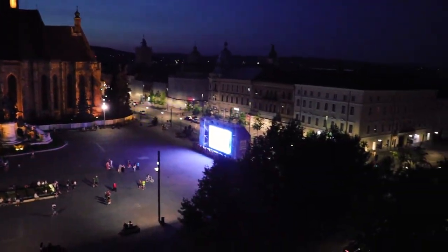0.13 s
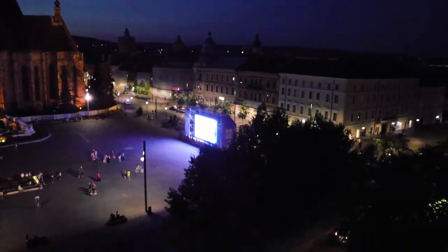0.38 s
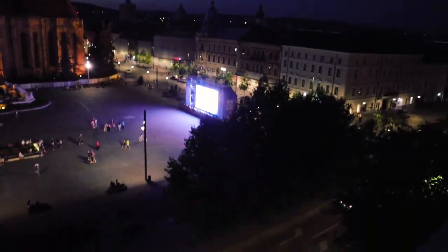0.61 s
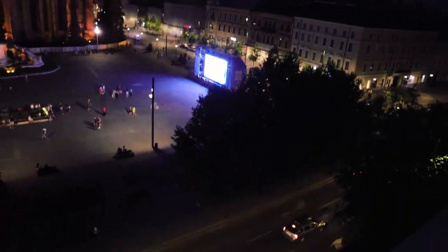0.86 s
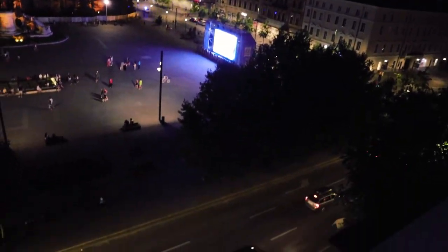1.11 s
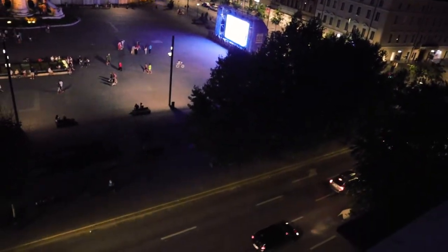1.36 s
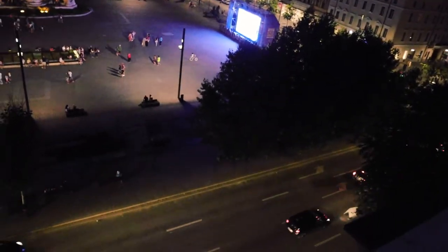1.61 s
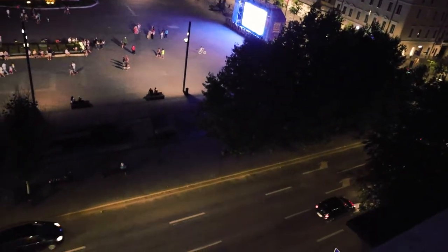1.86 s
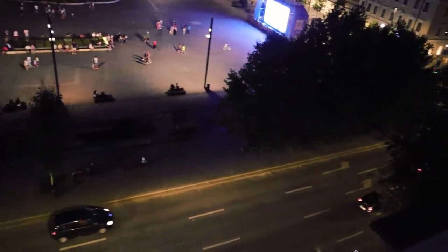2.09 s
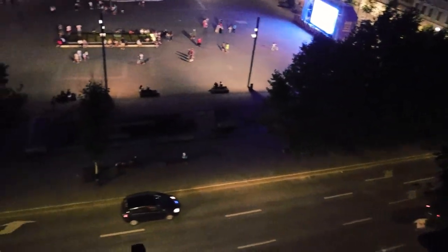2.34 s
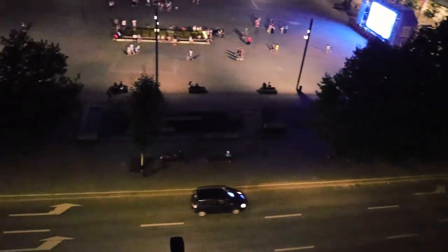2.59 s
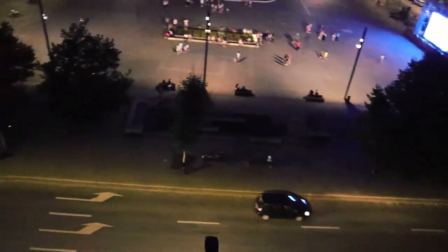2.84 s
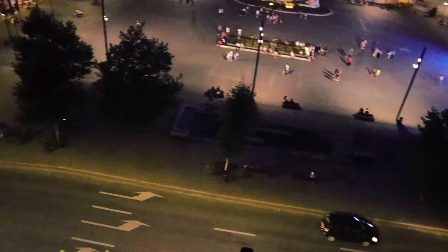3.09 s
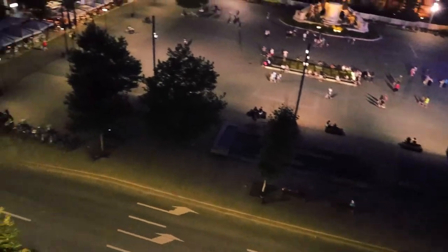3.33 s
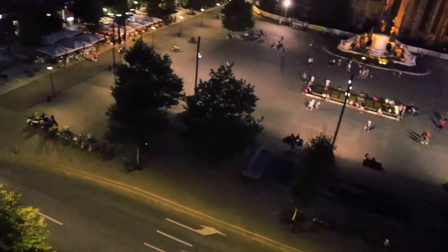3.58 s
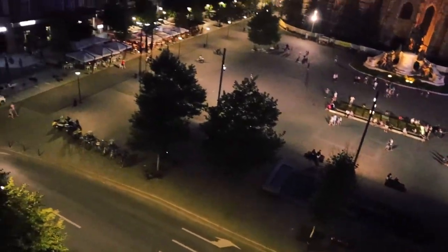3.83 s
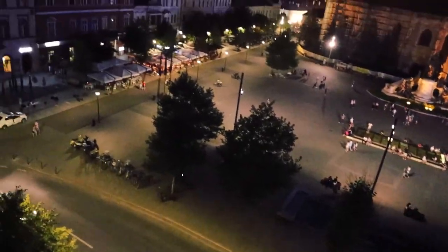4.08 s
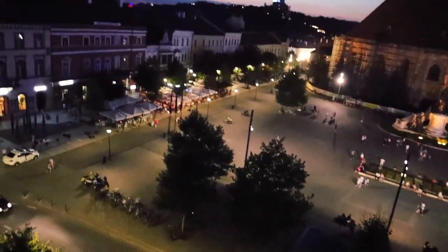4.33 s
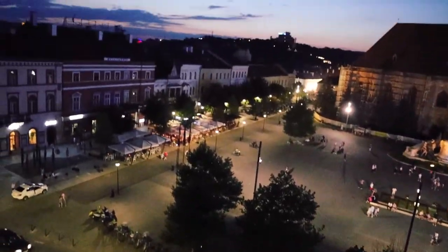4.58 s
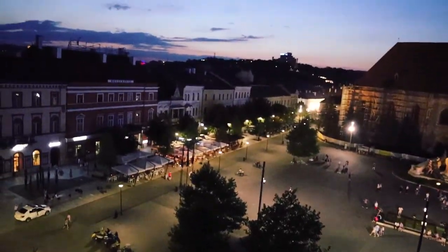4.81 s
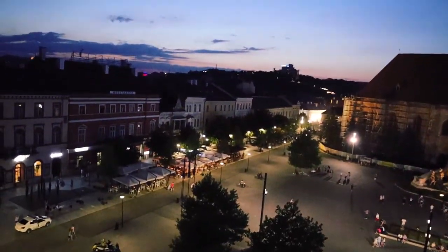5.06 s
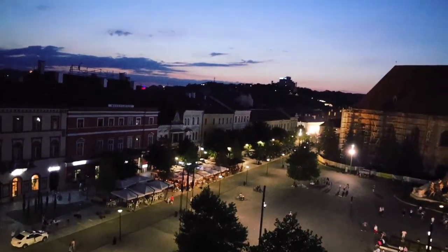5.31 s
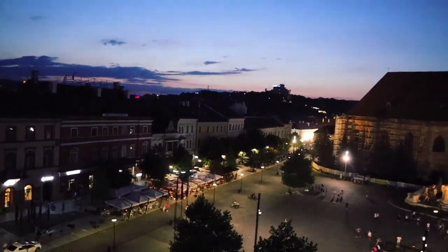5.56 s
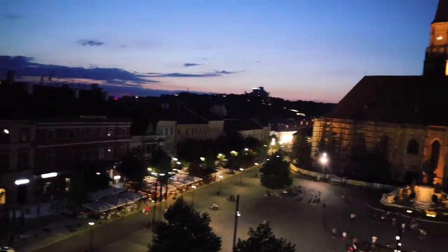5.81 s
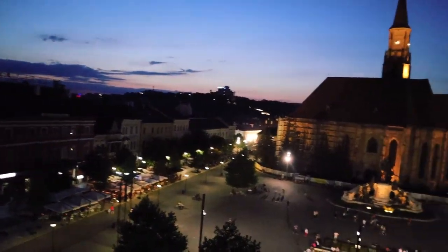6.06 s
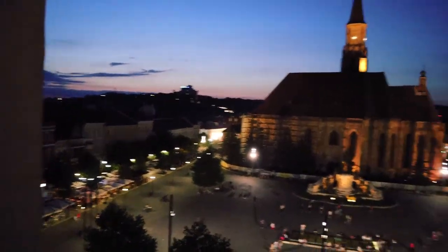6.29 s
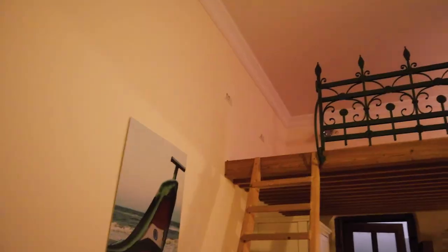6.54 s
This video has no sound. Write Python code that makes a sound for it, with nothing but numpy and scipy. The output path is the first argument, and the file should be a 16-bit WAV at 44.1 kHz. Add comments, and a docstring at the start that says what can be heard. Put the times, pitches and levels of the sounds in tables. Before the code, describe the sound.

From a high window, a hand-held camera hears continuous evening traffic: deep rumble, broad tyre roar and soft hiss. Low engines hum, and a dull bump thumps before two and a half seconds. A heavy engine swells near four seconds, with tiny brake squeaks before it. Two faint swift calls come late. A handling tick, then an abrupt cut to a muffled room with more ticks.

```python
"""Evening traffic from a high window

A hand-held camera pans over the street: coloured noise makes deep rumble, tyre roar, hiss and top treble.
Oscillators make a heavy engine, further hums, whines, brake squeaks and two swift calls; wheels thump on a bump.
A cut with a short near-mute leads indoors, to a muffled street and a faint hum.
Before and after the cut the camera's housing ticks in the hand, as short ringing modes with a crack of noise."""
import sys
import numpy as np
from scipy import signal
from scipy.fft import rfft, irfft, next_fast_len
from scipy.io import wavfile
from scipy.ndimage import uniform_filter1d, map_coordinates

SR = 44100
rng = np.random.default_rng(int(sys.argv[2]) if len(sys.argv) > 2 else 0)


def volts_from_decibels(level):
    """Turn decibel levels (scalar or array-like) into linear amplitude factors."""
    exponent = np.asarray(level, float) / 20
    return 10 ** exponent


def materialize(psi):
    """Save the field psi as 16-bit PCM at rate SR to the path in sys.argv[1].

    A 1-D psi becomes a single channel; in a 2-D psi each row is a channel.
    """
    bounded = np.clip(np.atleast_2d(psi).T, -1, 1)
    quanta = np.round(bounded * 32767).astype(np.int16)
    wavfile.write(sys.argv[1], SR, quanta)


N = 294147

# the road below as the camera pans: [t/s, tyre roar level/dB, toward the left -1..1]
ROAD_PAN = [(0, -24, .2), (2.2, -22.5, 0.22), (3.35, -22, .1), (4.2, -23, -.02), (5.4, -23.5, -.09),
            (6.44, -25.5, -0.15)]
# level of the top treble: [t/s, level/dB]
SIZZLE_LEVEL = [(0, -49), (.6, -52.5), (1.2, -50), (2.2, -53), (2.75, -59.5), (3.35, -52.5), (4.2, -54.5),
                (4.8, -57), (5.4, -53), (6.15, -58.5)]
# noise colours in the mid channel, each relative: [f/Hz, level/dB per Hz]
DEEP_COLOUR = [(15, -24), (25, -5), (32, -12), (40, 2), (55, 6.5), (75, 0.5), (95, -7.5), (130, -54.5)]
RUMBLE_COLOUR = [(45, -39), (70, -1.5), (100, 0), (135, 1), (165, -2.5), (260, -9.5), (340, -32),
                 (570, -120)]
ROAR_COLOUR = [(110, -26), (180, -1.5), (337, -2.5), (439, -1.5), (513, -3.5), (600, -2.5), (971, -4.5),
               (1380, -7), (3200, -28.5), (4160, -37.5), (7040, -120)]
HISS_COLOUR = [(1060, -27), (1800, -1.5), (3690, -14.5), (4570, -17), (7500, -31.5), (9750, -66),
               (16500, -120)]
SIZZLE_COLOUR = [(3000, -13), (4600, 5.5), (5500, 1), (6500, 1.5), (8000, -1), (8700, -7), (9550, 2),
                 (10300, -1.5), (11800, -4.5), (12900, -13.5)]
ROOM_COLOUR = [(20, -40), (45, -3), (100, -5), (170, -9), (250, 1), (330, -8.5), (700, -6), (1100, -11.5),
               (1700, -17.5), (3000, -29.5), (5500, -40.5), (8000, -47), (12500, -49), (16000, -75)]
# widened microphone pair, before each source's own offset: [f/Hz, side over mid level/dB]
PAIR_WIDTH = [(60, -40), (110, -44), (200, -18.5), (360, -11.5), (640, -8), (1160, -1.5), (2100, 4.5),
              (3810, 5.5), (6890, 9), (12500, 7.5)]
# heavy engine: [t/s, firing f/Hz, firing line rms level/dB]
HEAVY_ENGINE = [(1.3, 62.5, -36), (2.1, 67.3, -30), (2.55, 69.5, -30.5), (2.8, 69.3, -31), (3, 68.6, -27),
                (3.46, 68.3, -25), (3.85, 67.6, -20), (4.15, 67.93, -24.5), (4.6, 71.3, -22.5),
                (4.85, 71.1, -25), (5.2, 63.3, -30)]
# further engines, wavering hums: [start t/s, end t/s, start f/Hz, end f/Hz, rms level/dB]
ENGINE_HUMS = [(0.5, 2.9, 36, 48, -32.5), (3, 4.35, 56, 50, -35), (5.5, 6.45, 50, 50, -33.5),
               (-0.5, 1.58, 57, 60, -35.5), (1.4, 2.43, 82, 81, -33.5), (5.1, 6, 137, 140, -34),
               (6, 6.4, 140, 138, -28), (3, 6.5, 90, 99, -34.5), (0.5, 1.4, 124, 126, -34.5)]
# wheels thump over a bump: [t/s, level before the soft onset/dB, starting f/Hz]
BUMP_THUMPS = [(2.437, -8, 105)]
# ticks of the housing: [t/s, level/dB, centre of the blow f/Hz, crack relative level/dB, left over right/dB]
HOUSING_TICKS = [(6.3252, -21.5, 3000, -10, 1), (6.52, -19.5, 3200, -10, -3), (6.5303, -23, 3000, -12, 6),
                 (6.56, -20.5, 1910, -40, -8), (6.5922, -27, 3600, -2, -4), (6.613, -29, 2800, -13, -3)]
# modes of the housing: [f/Hz, relative level/dB, t60/s]
HOUSING_MODES = [(1700, 3, 0.02), (2100, -1, .018), (2450, 0, 0.02), (3000, -4, .014), (3800, -5, 0.011),
                 (4500, -1, 0.017), (6460, -3, .01)]
# rough narrow whines: [start t/s, length/s, f/Hz, amplitude level/dB]
WHINE_LINES = [(.1, 1.6, 2160, -46.5), (.1, 1.3, 4550, -57), (.85, .32, 4600, -58),
               (5.78, 0.095, 1970, -35), (2.4, 3.2, 9700, -70)]
# squeaks of one brake: [start t/s, length/s, amplitude level/dB]
BRAKE_SQUEAKS = [(3, .08, -57), (3.2, .07, -64), (3.348, .046, -56), (3.5, .065, -52), (3.6, .04, -60)]
# swift calls: [t of the lowest pitch/s, lowest f/Hz, fall into it/Hz, rise out of it/Hz, rms level at the peak/dB]
SWIFT_CALLS = [(5.785, 6200, 199, 650, -52), (6.208, 6420, 446, 350, -51)]
# the cut: [street ends t/s, room starts t/s]
CUT_TIMES = (6.4432, 6.4548)

RUMBLE_DB = -5  # over the roar
HISS_DB, HISS_FADES_DB_PER_S = -38.5, 0.15  # start level at average roar
HISS_FOLLOWS = 0.66  # share of the roar's swell in dB
DEEP_DB, DEEP_FADES_DB_PER_S = -29, 0.6  # start level
SECOND_ORDER_DB, HUM_WAVER_HZ = -36, 1.56
THUMP_T60_S = .1
BLOW_OCTAVES = .5  # spread of a blow over the modes
WHINE_SPREAD = .025  # of the pitch
SQUEAK_HZ, SQUEAK_SPREAD_HZ = 7130, 50
SWIFT_LENGTH_S = 0.075
ROOM_DB, MUTE_DB = -33.5, -32  # the mute is relative to the room
ROOM_HUM_HZ, ROOM_HUM_DB = 249.6, -46


def unit(x):
    """Scale to rms 1."""
    return x / np.sqrt(np.mean(x ** 2) + 1e-20)


def along(points, hz):
    """Read (Hz, value) points on a log axis."""
    f, v = np.transpose(points)
    return np.interp(np.log(hz + 1), np.log(f + 1), v)


def curves(rows):
    """One value per sample for each column after the time."""
    s, *cols = np.transpose(rows)
    return [np.interp(np.arange(N) / SR, s, c) for c in cols]


def span(start, end, fade):
    """1 between two times, with soft edges."""
    t = np.arange(N) / SR
    return np.sin(np.pi / 2 * np.clip(np.minimum(t - start, end - t) / fade, 0, 1)) ** 2


def wobble(rate):
    """A smooth random curve, rate knots a second."""
    knots = rng.standard_normal(int(N * rate / SR) + 4)
    return map_coordinates(knots, [np.arange(N) * rate / SR])


def filtered(x, response):
    """Shape the spectrum of x by a response of frequency."""
    m = next_fast_len(N + 8192)
    return irfft(rfft(x, m) * response(np.fft.rfftfreq(m, 1 / SR)), m)[..., :N]


def widened(mid, side, extra_db=0):
    """Left and right from mid and side; the pair passes little side in the bass and much in the treble."""
    side = filtered(side, lambda hz: volts_from_decibels(along(PAIR_WIDTH, hz) + extra_db))
    return np.array([mid + side, mid - side])


def rush(spectrum, patchy_db, leftward, lag, extra_db=0):
    """Wide patchy noise, mid rms 1; side follows mid off to one side, in quadrature for an early left."""
    z = signal.stft(rng.standard_normal((2, N + 512)), nperseg=512)[2]
    field = uniform_filter1d(rng.standard_normal(z.shape[1:]), size=6, axis=0)
    field = uniform_filter1d(field, size=12, axis=1)
    pair = signal.istft(z * volts_from_decibels(patchy_db * unit(field)), nperseg=512)[1][:, :N]
    mid, other = unit(filtered(pair, lambda hz: volts_from_decibels(along(spectrum, hz))))
    early = filtered(mid, lambda hz: 1j * (hz > 0))
    own = np.sqrt(np.clip(1 - leftward ** 2 - lag ** 2, 0, 1))
    return widened(mid, leftward * mid + lag * early + own * other, extra_db)


def tone(hz):
    """Phase of an oscillator that follows a pitch per sample."""
    return 2 * np.pi * (np.cumsum(hz) / SR + rng.random())


def rough_line(start, length, hz, spread_hz, db):
    """A narrow line with fast scatter of pitch and level."""
    level = volts_from_decibels(db + 2.68 * wobble(120)) * span(start, start + length, fade=.25 * length)
    return level * np.sin(tone(hz + spread_hz * wobble(150)))


def traffic():
    """Many cars at once: rumble and hiss follow the tyre roar; every layer also swells on its own."""
    t = np.arange(N) / SR
    roar_db, leftward = curves(ROAD_PAN)
    treble_db, = curves(SIZZLE_LEVEL)
    deep_db = DEEP_DB - DEEP_FADES_DB_PER_S * t
    hiss_db = HISS_DB + HISS_FOLLOWS * (roar_db - roar_db.mean()) - HISS_FADES_DB_PER_S * t
    flutter = wobble(8.3)  # shared by roar, hiss and top treble

    deep = rush(DEEP_COLOUR, patchy_db=0.4, leftward=0, lag=0)
    deep = deep * volts_from_decibels(deep_db + 0.42 * wobble(2.95))
    rumble = rush(RUMBLE_COLOUR, patchy_db=1.34, leftward=leftward, lag=.1)
    rumble = rumble * volts_from_decibels(roar_db + RUMBLE_DB + 1.26 * wobble(3.92))
    roar = rush(ROAR_COLOUR, patchy_db=0.53, leftward=leftward, lag=0.17)
    roar = roar * volts_from_decibels(roar_db + 0.55 * flutter + 0.71 * wobble(2.905))
    hiss = rush(HISS_COLOUR, patchy_db=0.7, leftward=0.14 * leftward, lag=.1)
    hiss = hiss * volts_from_decibels(hiss_db + 0.2 * flutter + 0.63 * wobble(12))
    sizzle = rush(SIZZLE_COLOUR, patchy_db=2.0, leftward=0, lag=0)
    sizzle = sizzle * volts_from_decibels(treble_db + 0.26 * flutter + 1.1 * wobble(8.9))
    return deep + rumble + roar + hiss + sizzle


def heavy_engine():
    """Only low orders carry this far: a firing line of moving pitch and its second order."""
    hz, firing_db = curves(HEAVY_ENGINE)
    phase = tone(hz + .25 * wobble(8))
    firing = volts_from_decibels(firing_db + 0.46 * wobble(11)) * np.sin(phase)
    second = volts_from_decibels(SECOND_ORDER_DB + 3.2 * wobble(5.07)) * np.sin(2 * phase)
    return np.sqrt(2) * (firing + second) * span(HEAVY_ENGINE[0][0], HEAVY_ENGINE[-1][0], fade=0.16)


def further_engines():
    """Each engine is one low sine, wavering in pitch and level."""
    out = np.zeros(N)
    for start, end, from_hz, to_hz, db in ENGINE_HUMS:
        pitch, = curves([(start, from_hz), (end, to_hz)])
        level = volts_from_decibels(db + 0.97 * wobble(5)) * span(start - .2, end + 0.15, fade=0.37)
        out += np.sqrt(2) * level * np.sin(tone(pitch + HUM_WAVER_HZ * wobble(7.1)))
    return out


def thump():
    """A dull push with a soft onset and a decaying sine whose pitch sags at first."""
    s, db, hz = np.transpose(BUMP_THUMPS)[:, :, None]
    t = np.clip(np.arange(N) / SR - s, 0, None)
    level = volts_from_decibels(db - 60 * t / THUMP_T60_S) * (1 - np.exp(-t / 0.0053))
    sag = 1 - 2.5 * np.minimum(t, .1)
    return -np.sum(level * np.sin(2 * np.pi * hz * t * sag), axis=0)


def ticks():
    """Each tick rings modes near its centre and adds a crack, largely opposite at the two microphones."""
    out, t = np.zeros((2, N + SR)), np.arange(SR // 20) / SR
    hz, level_db, t60 = np.transpose(HOUSING_MODES)[:, :, None]
    dull = signal.butter(2, [1500, 11000], "band", fs=SR)
    for s, db, centre_hz, crack_db, pan_db in HOUSING_TICKS:
        nearness = np.exp(-(np.log2(hz / centre_hz) / BLOW_OCTAVES) ** 2 / 2)
        struck = nearness * volts_from_decibels(level_db + rng.normal(0, 2.6, (2, len(hz), 1)))
        phase = 2 * np.pi * rng.random((len(hz), 1)) + rng.normal(0, .4, (2, len(hz), 1))
        phase = phase + [[[0]], [[2.1]]]  # radians, left and right
        decay = (1 - np.exp(-t / .0004)) * volts_from_decibels(-60 * t / t60)
        ring = 0.62 * np.sum(struck * decay * np.sin(2 * np.pi * hz * t + phase), axis=1)
        common, left, right = rng.standard_normal((3, len(t)))
        noise = signal.lfilter(*dull, [left + 1.1 * common, right - 0.77 * common])
        crack = volts_from_decibels(crack_db - 60 * t / 0.006) * noise
        balance = volts_from_decibels(db + pan_db * np.array([[.5], [-.5]]))
        out[:, round(s * SR):][:, :len(t)] += balance * (ring + crack)
    return out[:, :N]


def whines():
    """Rough narrow lines, their pitch scattered in proportion to it."""
    out = sum(rough_line(start, length, hz, WHINE_SPREAD * hz, db) for start, length, hz, db in WHINE_LINES)
    return widened(out, out, extra_db=-1.0)


def brake_squeaks():
    """Short rough lines round the one pitch of one brake."""
    out = sum(rough_line(start, length, SQUEAK_HZ, SQUEAK_SPREAD_HZ, db) for start, length, db in BRAKE_SQUEAKS)
    return widened(out, out, extra_db=-1.0)


def swifts():
    """Each call is a short sine whose pitch dips and rises along a parabola."""
    out = np.zeros(N)
    for s, low_hz, fall_hz, rise_hz, db in SWIFT_CALLS:
        away = np.clip((np.arange(N) / SR - s) / (SWIFT_LENGTH_S / 2), -1, 1)
        bend = np.where(away < 0, fall_hz, rise_hz) * away ** 2
        level = volts_from_decibels(db + 2.2 * wobble(60)) * np.sqrt(1 - away ** 2)
        out += np.sqrt(2) * level * np.sin(tone(low_hz + bend + 30 * wobble(200)))
    return widened(out, out, extra_db=-12)


def room():
    """Dull wide noise for the street behind the window, and a faint hum wavering in pitch and level."""
    muffled = volts_from_decibels(ROOM_DB) * rush(ROOM_COLOUR, patchy_db=0.5, leftward=-.05, lag=.1, extra_db=-1.2)
    hum = volts_from_decibels(ROOM_HUM_DB + 1.5 * wobble(18)) * np.sin(tone(ROOM_HUM_HZ + 4 * wobble(15)))
    return muffled + np.sqrt(2) * hum


def scene():
    """Street until the cut, a near-mute, then the room; the ticks run on either side of the cut."""
    street_ends, room_starts = CUT_TIMES
    street = traffic() + heavy_engine() + further_engines() + thump()
    street = street + whines() + brake_squeaks() + swifts()
    outside = street * span(-1, street_ends, fade=0.00036)
    opening = span(room_starts, 8, fade=0.0012) + volts_from_decibels(MUTE_DB) * span(street_ends, 8, fade=.001)
    return outside + room() * opening + ticks()


def band_limit(x):
    """A steep low-pass at the top of the band."""
    return signal.sosfilt(signal.butter(12, 15600, fs=SR, output="sos"), x)


def record(dry):
    """The camera's microphone fades out above about 13 kHz."""
    fade_out = [(12900, 0), (14000, -9), (16800, -38)]  # [f/Hz, level/dB]
    heard = filtered(dry, lambda hz: volts_from_decibels(along(fade_out, hz)))
    return band_limit(heard)


dry = scene()
out = record(dry)
materialize(out)
```